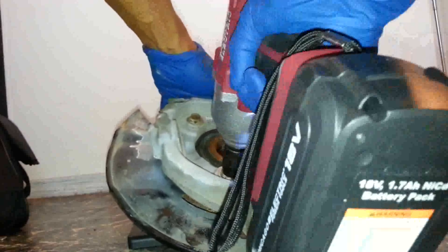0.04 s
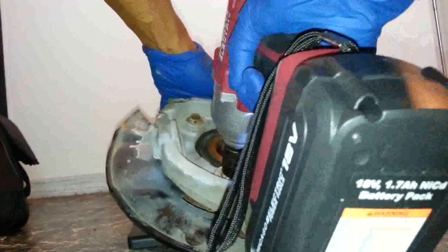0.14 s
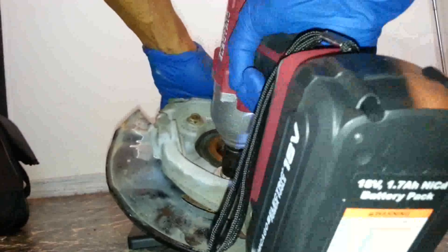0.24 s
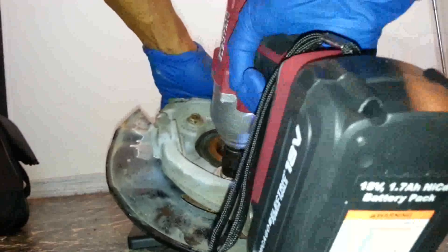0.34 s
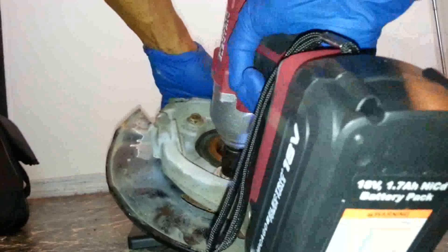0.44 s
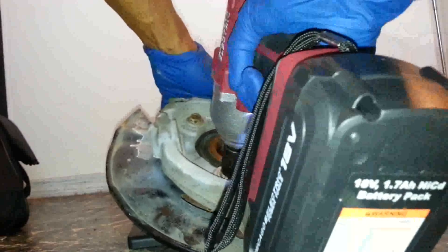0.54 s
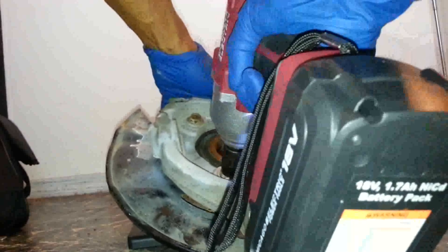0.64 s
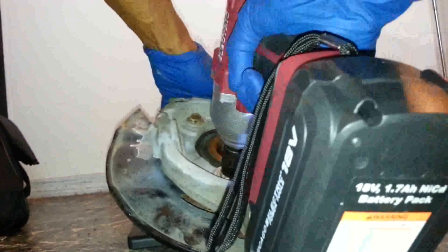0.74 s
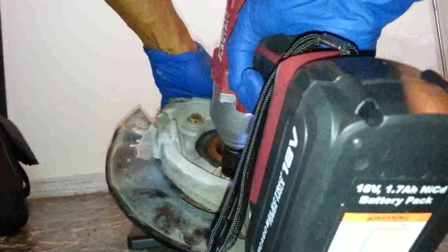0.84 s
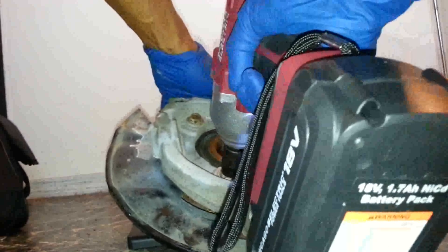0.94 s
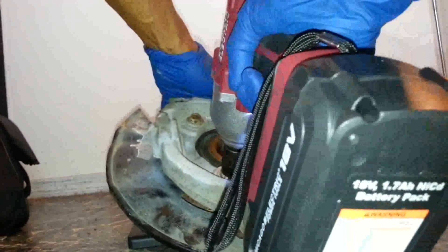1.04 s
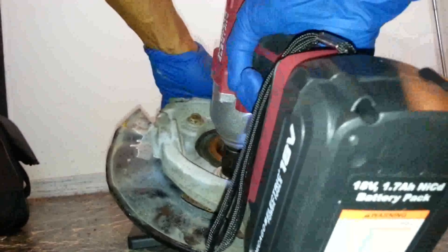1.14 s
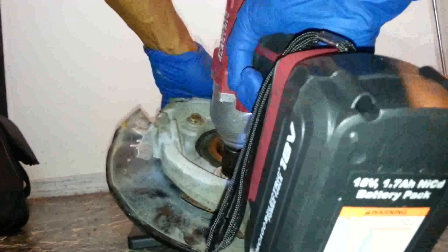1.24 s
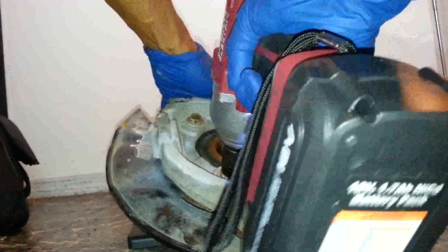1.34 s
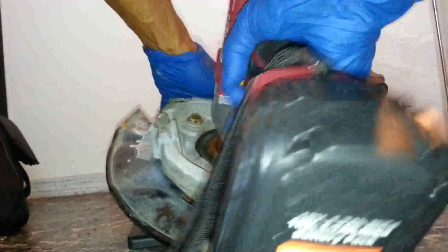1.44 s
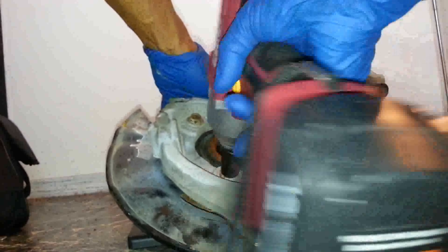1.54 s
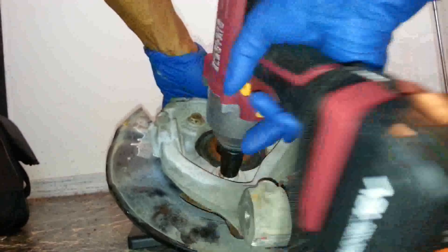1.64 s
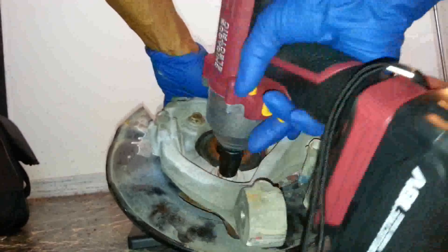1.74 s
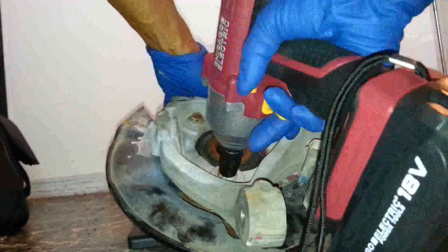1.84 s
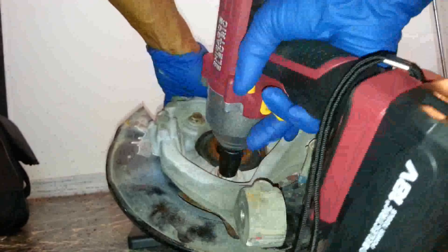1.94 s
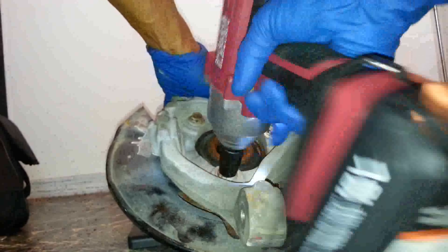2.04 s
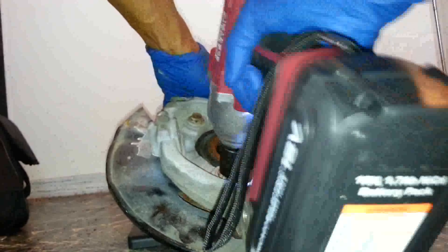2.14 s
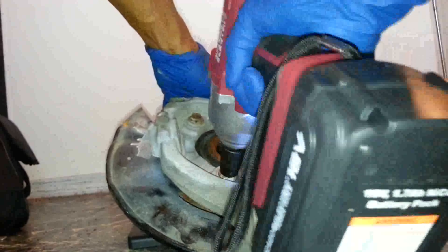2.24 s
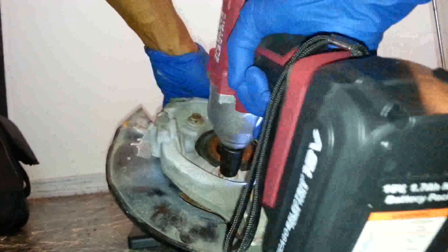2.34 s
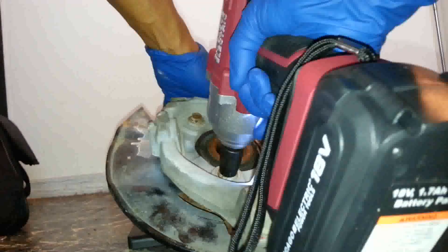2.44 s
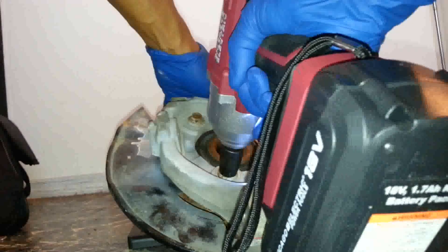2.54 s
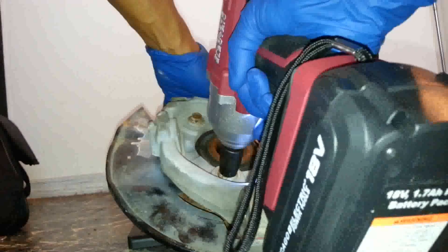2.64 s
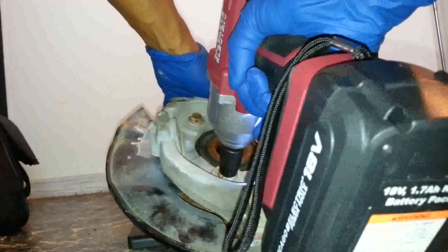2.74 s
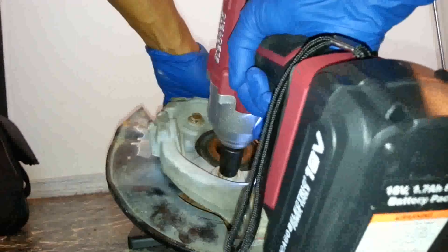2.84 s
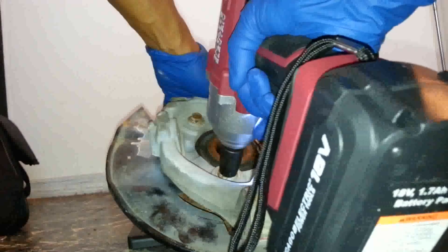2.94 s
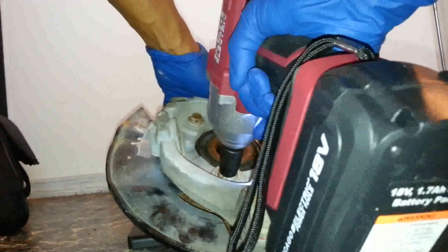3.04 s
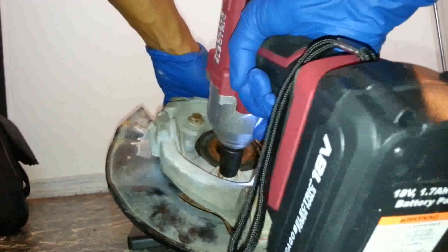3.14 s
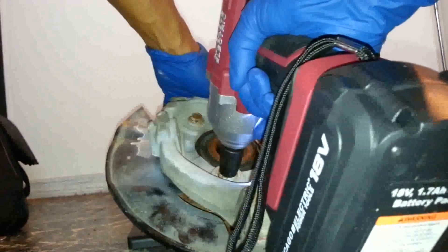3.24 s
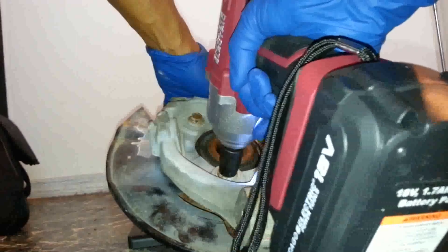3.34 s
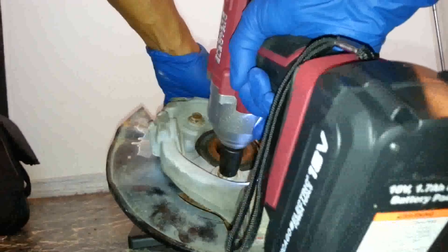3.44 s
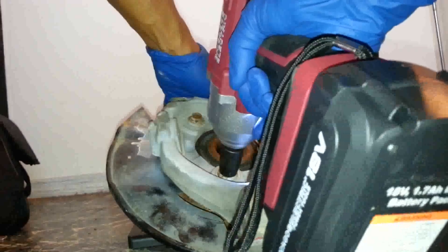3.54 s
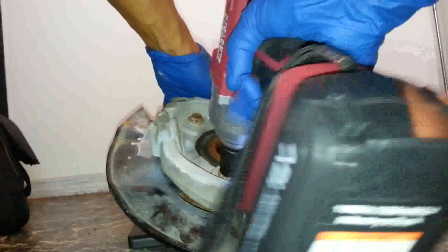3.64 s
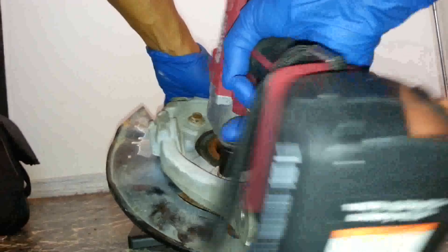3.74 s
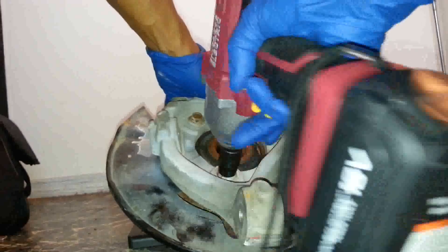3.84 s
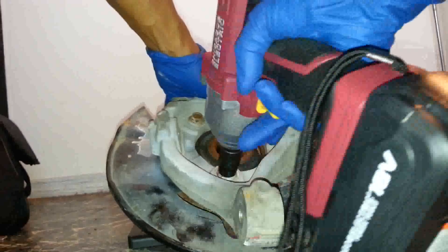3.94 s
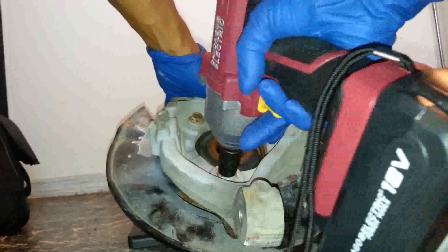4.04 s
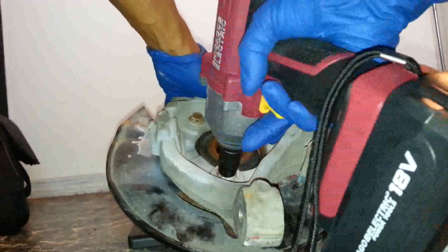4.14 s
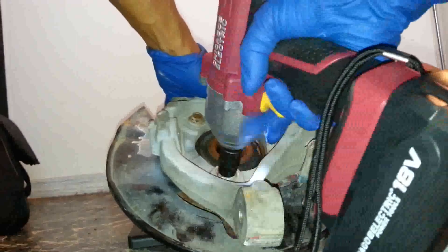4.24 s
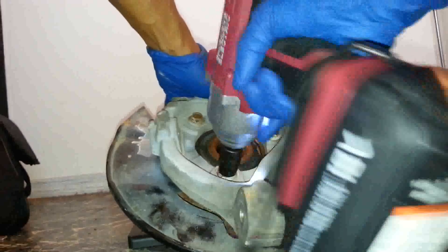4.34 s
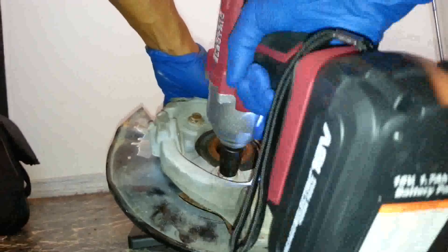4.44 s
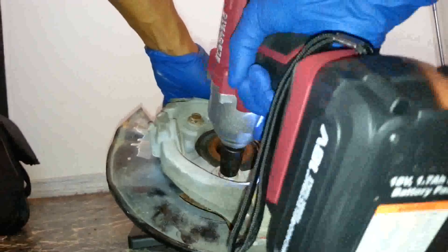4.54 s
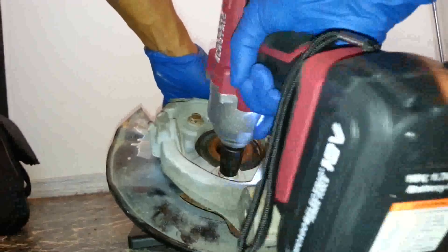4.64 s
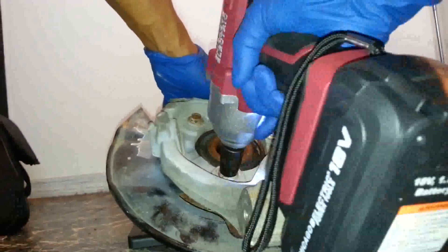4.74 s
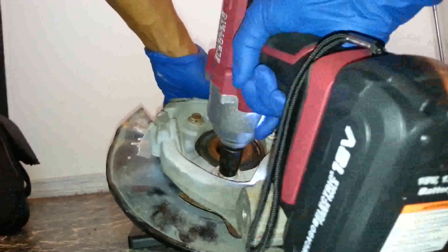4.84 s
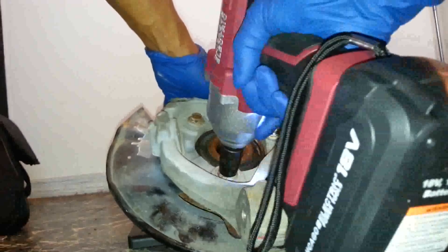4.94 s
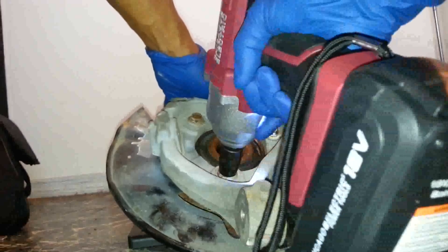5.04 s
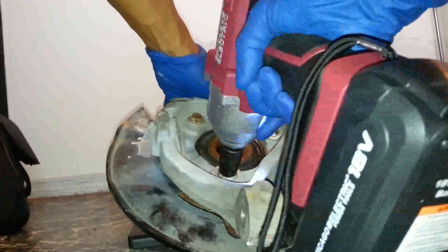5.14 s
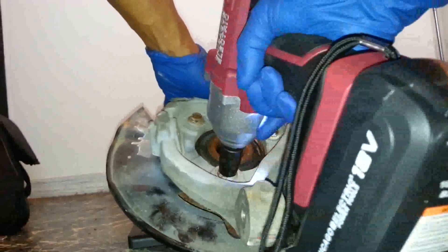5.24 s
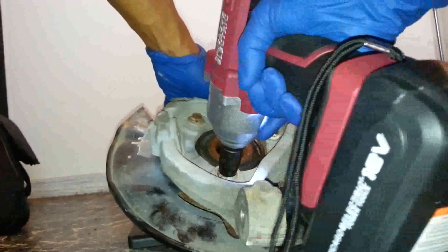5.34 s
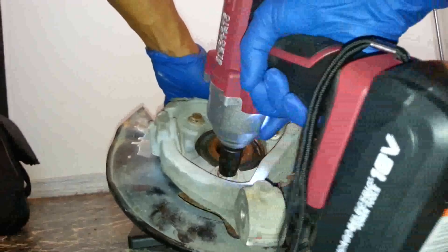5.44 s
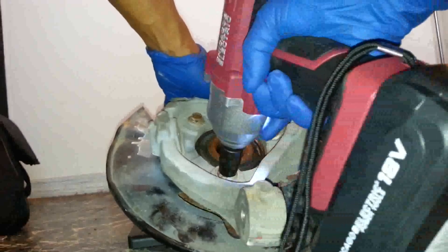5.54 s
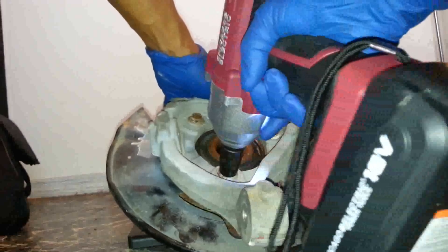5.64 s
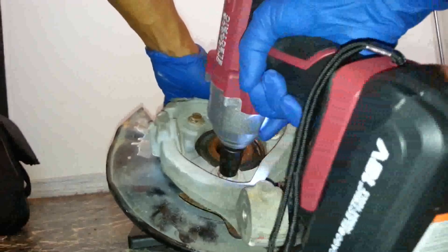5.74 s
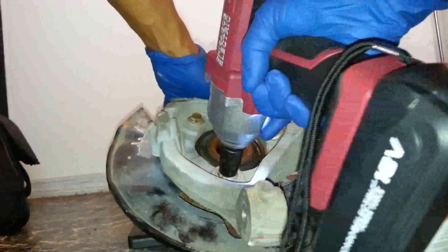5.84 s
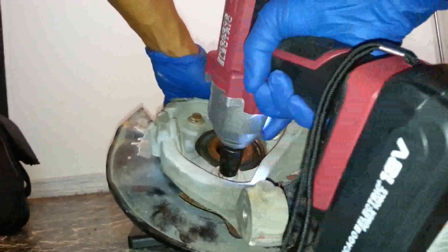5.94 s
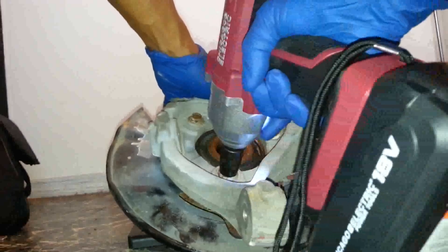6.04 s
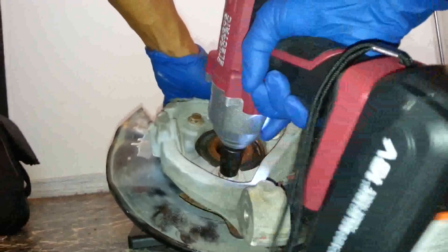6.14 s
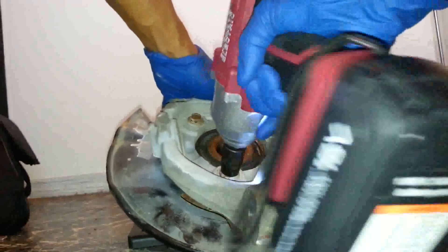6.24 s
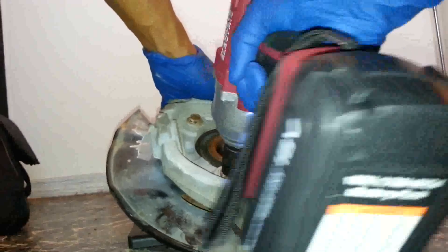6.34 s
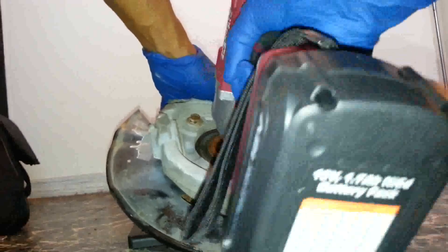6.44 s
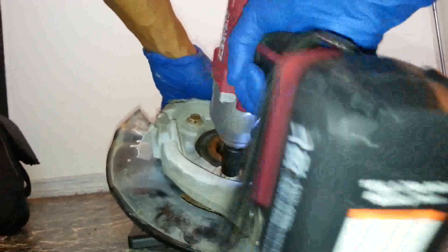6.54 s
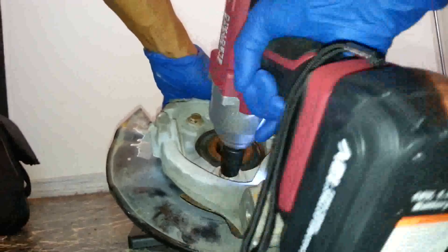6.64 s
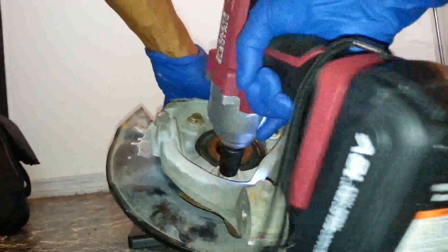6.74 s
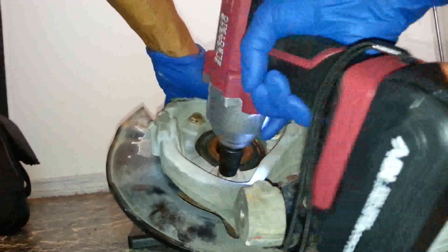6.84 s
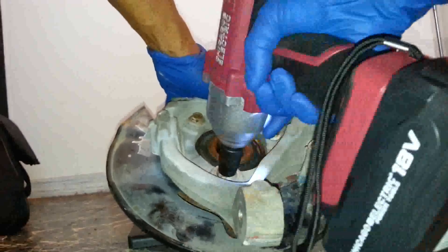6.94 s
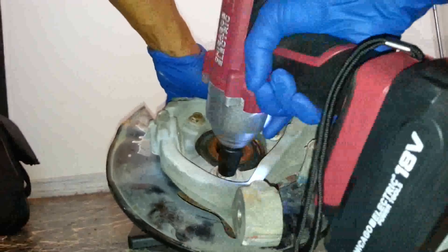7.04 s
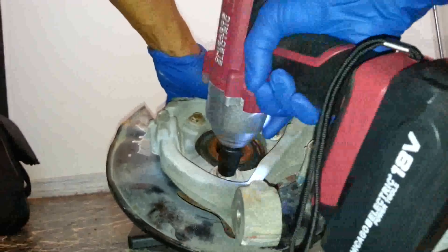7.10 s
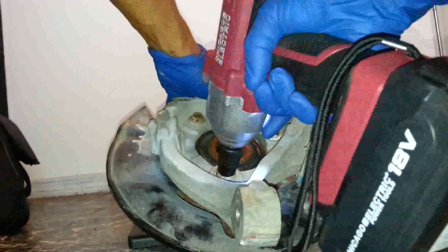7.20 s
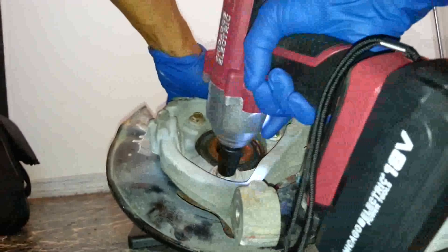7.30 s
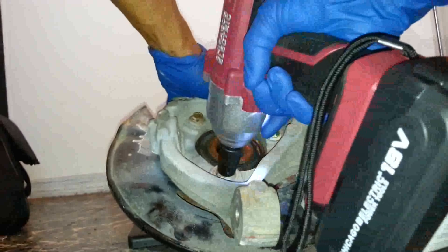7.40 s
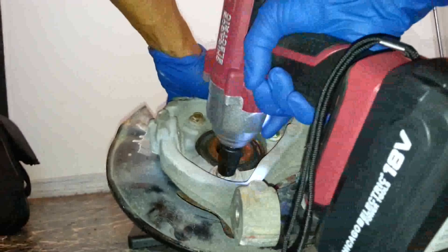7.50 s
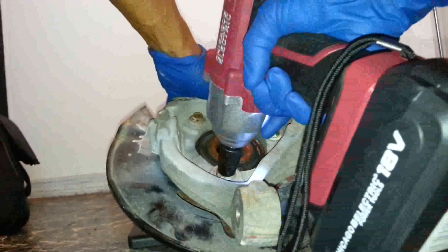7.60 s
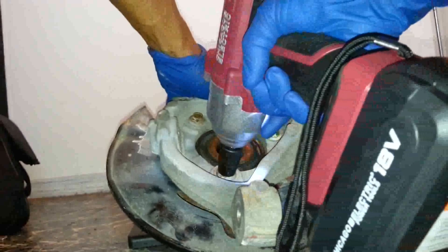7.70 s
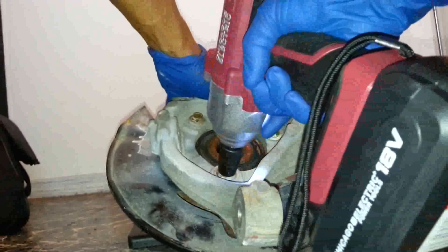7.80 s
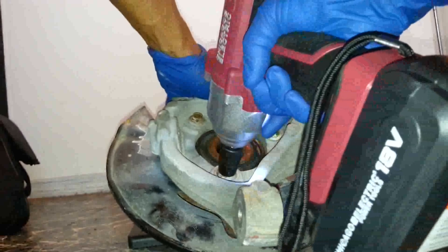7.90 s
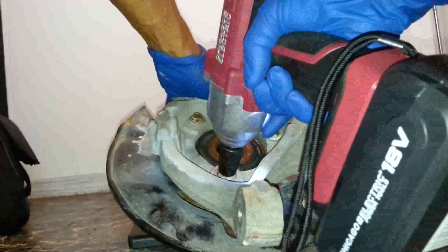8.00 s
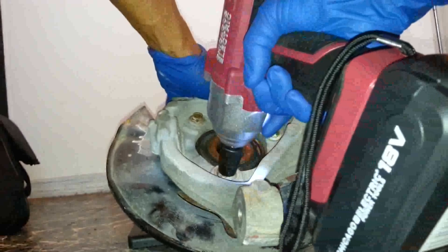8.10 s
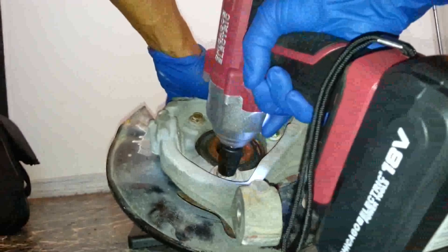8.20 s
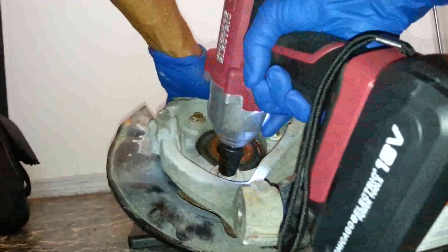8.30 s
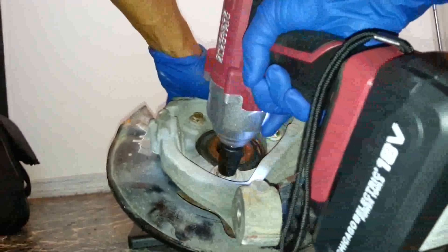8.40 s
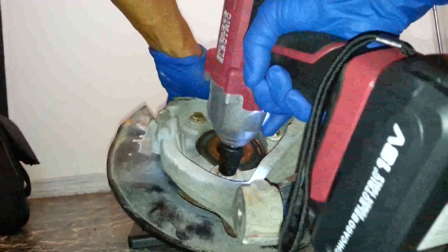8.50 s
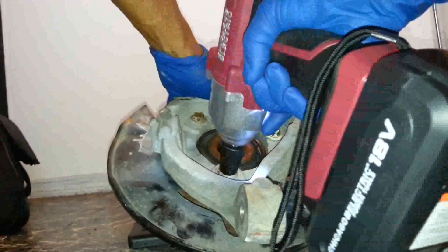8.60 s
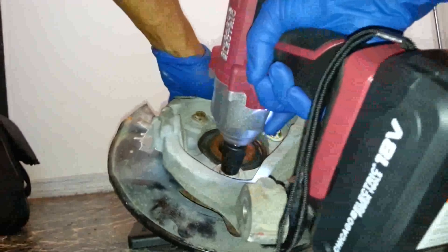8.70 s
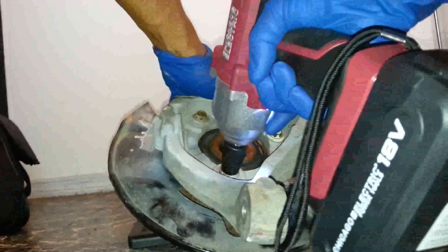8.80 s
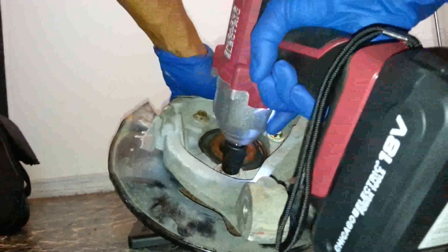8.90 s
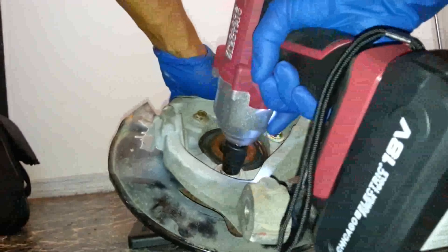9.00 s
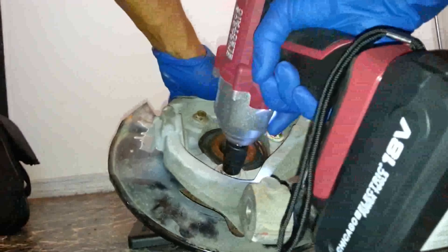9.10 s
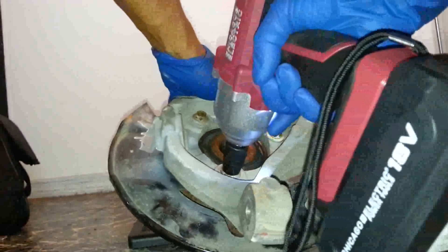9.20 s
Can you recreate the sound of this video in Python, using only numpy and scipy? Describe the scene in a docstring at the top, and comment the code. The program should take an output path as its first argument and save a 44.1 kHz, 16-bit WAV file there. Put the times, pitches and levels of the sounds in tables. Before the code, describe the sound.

The sound begins mid-burst: a cordless impact wrench, very close in a small reverberant workshop, hammers a seized bolt at about forty blows a second, a harsh, bright steel clatter with a dull body buzz below. At about 1.5 seconds it stops; the braking motor gives a thud and low ring, and echoes decay into faint background. Around 2.0 the gears rasp quickly upward, steel clacks, and a second burst runs from 2.1 to 3.7. Another jolt and echoing pause follow. At 4.25 the motor runs up again, a hard clack lands at 4.35, and the longest burst continues to the end. Its ringing changes colour as the tool shifts; from about 6.7 a loose socket rattles more strongly, sliding slightly lower after 8.2. The overloaded microphone flattens everything, with brief jumps in level.

```python
"""In a small workshop, close by, a cordless impact wrench hammers on a seized bolt in a steel housing, in three bursts.
Some forty blows a second, noise shaped by resonances, ring socket, anvil and housing; the first burst is under way.
The gears rasp as the motor runs up for the next two, and braking after the first two jolts the tool into a low ring.
Echoes made of fading noise fill the gaps over a faint background. The din overloads the microphones,
gain control presses it flat, and now and then the level jumps briefly."""
import sys
import numpy as np
from scipy import signal
from scipy.fft import rfft, irfft, next_fast_len
from scipy.io import wavfile
from scipy.ndimage import uniform_filter1d

SR = 44100
rng = np.random.default_rng(int(sys.argv[2]) if len(sys.argv) > 2 else 0)


def dump(signal):
    """Clip the signal to [-1, 1] and save it as 16-bit WAV at the path in sys.argv[1]."""
    limited = np.clip(np.atleast_2d(signal).T, -1, 1)
    pcm = np.round(limited * 32767).astype(np.int16)
    wavfile.write(sys.argv[1], SR, pcm)


N = 408366


def amp(db):
    """Decibels to gain."""
    return 10 ** (np.asarray(db) / 20)


def unit(x):
    """Scale to rms 1."""
    return x / np.sqrt(np.mean(x ** 2) + 1e-20)


def along(points, hz):
    """(Hz, value) points read on a log frequency axis."""
    f, v = np.transpose(points)
    return np.interp(np.log(hz + 1), np.log(f + 1), v)


def clock():
    """Sample times in seconds, from half a second early so that steel and room already ring."""
    return np.arange(-(SR // 2), N) / SR


def curve(rows):
    """(seconds, value) rows drawn out to one value per sample."""
    s, value = np.transpose(rows)
    return np.interp(clock(), s, value)


def noise():
    """Two unrelated channels of white noise."""
    return rng.standard_normal((2, len(clock())))


def filtered(x, gain):
    """x times a gain that depends on frequency."""
    size = next_fast_len(x.shape[-1] + SR // 4)
    spectrum = rfft(x, size) * gain(np.fft.rfftfreq(size, 1 / SR))
    return irfft(spectrum, size)[..., :x.shape[-1]]


def resonances(modes, hz):
    """Summed power response of (Hz, width Hz, dB) modes: each peaks at its centre and halves half a width away."""
    return sum(amp(db) ** 2 / (1 + (2 * (hz - centre) / width) ** 2) for centre, width, db in modes)


def ring(x, power, size=16384):
    """x through the causal, minimum-phase filter of energy 1 that has the shape of this power response."""
    cepstrum = irfft(np.log(power(np.fft.rfftfreq(size, 1 / SR)) + 1e-12) / 2)
    # folding the cepstrum forward in time makes the ring start at once and then die away
    response = irfft(np.exp(rfft(2 * cepstrum[:size // 2], size)))[:size // 2]
    response = response / np.linalg.norm(response)
    return signal.fftconvolve(x, response[None], axes=1)[:, :x.shape[1]]


# Colour of the faint background. Each row: frequency in Hz, relative level in dB.
BACKGROUND_COLOUR = [(24, -26.5), (40, 11), (476, 19), (899, -36), (2460, -35), (2920, -27.5), (7400, -32),
                     (14000, -51)]


def background():
    """A faint, steady bed of coloured noise."""
    return amp(-66) * unit(filtered(noise(), lambda hz: amp(along(BACKGROUND_COLOUR, hz))))


# How long the room rings. Each row: frequency in Hz, time to fall by 60 dB in seconds.
ROOM_DECAY = [(100, 0.91), (400, 0.33), (1100, 0.33), (2500, 0.48), (5000, 0.47), (9000, 0.49),
              (13000, 0.36)]
# What the walls send back. Each row: frequency in Hz, level in dB.
WALL_COLOUR = [(100, -3), (7500, 0), (10000, -0.5), (14000, 1)]


def workshop(source, count=40):
    """The walls' answer: each frequency dies at its own speed, and the echo paths change as tool and arms move."""
    x = filtered(source, lambda hz: amp(along(WALL_COLOUR, hz)))
    n, tail_size = x.shape[1], SR * 2 // 3
    hop = n // count + 1
    out = np.zeros((2, n + 2 * tail_size))
    for start in range(-hop, n, hop):
        # a fresh tail of fading noise for each overlapping piece of the sound
        hz, t, cells = signal.stft(rng.standard_normal((2, tail_size)), SR, nperseg=256)
        fade = amp(-60 * t / along(ROOM_DECAY, hz)[:, None])
        tail = signal.istft(cells * fade, SR, nperseg=256)[1]
        i = np.arange(max(start, 0), min(start + 2 * hop, n))
        piece = x[:, i] * np.sin(np.pi * (i - start) / (2 * hop))
        echo = signal.fftconvolve(piece, tail / np.linalg.norm(tail[0]), axes=1)
        # the first echo comes 4 ms late
        out[:, i[0] + SR // 250:][:, :echo.shape[1]] += echo
    return out[:, :n]


# Low modes of the tool's body. Each row: frequency in Hz, relative level in dB, time to fall by 60 dB in seconds.
BODY_MODES = [(127.5, -2.5, 0.55), (176, -9.5, 0.81), (197, 13.5, 0.15), (238, 1, 0.15), (336, 4.5, 0.15),
              (374, -18, 0.81), (530, -14, 0.41), (886, -15, .4)]
# Jolts as the motor brakes; the gears coast from them too. Each row: start in seconds, level in dB.
BRAKE_JOLTS = [(1.527, -12.5), (3.772, -15)]


def brake(attack_s):
    """Letting go of the trigger jolts the tool, whose body rings low as a sum of fading sines."""
    out = np.zeros((2, len(clock())))
    t = np.arange(SR) / SR
    for s, jolt_db in BRAKE_JOLTS:
        hum = np.zeros((2, SR))
        for hz, mode_db, t60 in BODY_MODES:
            phase = rng.uniform(0, 2 * np.pi, (2, 1))
            hum += amp(mode_db - 60 * t / t60) * np.sin(2 * np.pi * hz * t + phase)
        out[:, np.searchsorted(clock(), s):][:, :SR] += amp(jolt_db) * hum * (1 - np.exp(-t / attack_s))
    return out


# The motor runs up freely. Each row: trigger in seconds, run-up time in seconds, relative level at full speed in dB.
MOTOR_RUN_UPS = [(1.998, .08, 0), (4.257, 0.057, -7.5)]
# gear level grows as speed to this power, holds at full speed, then fades as the hammer takes the load
SPEED_POWER, FREE_RUN_S, LOAD_DB_PER_S = 3.2, .015, 481
# the coasting gears fade in just before each brake jolt, then die away
COAST_DB, COAST_RISE_S, COAST_DB_PER_S = -14, 0.022, 115.5
# a faint floor for their last slow turns, and how long after the jolt they begin to fall silent
CREEP_DB, STANDSTILL_S = -56, 0.35


def gear_level():
    """Loudness of the gears: it grows with speed in each run-up and dies away after each brake jolt."""
    t = clock()
    level = np.zeros(len(t))
    for s, run_up_s, db in MOTOR_RUN_UPS:
        speed = np.clip((t - s) / run_up_s, 0, 1)
        loaded_s = np.maximum(t - s - run_up_s - FREE_RUN_S, 0)
        level += speed ** SPEED_POWER * amp(db - LOAD_DB_PER_S * loaded_s)
    for s, _ in BRAKE_JOLTS:
        corners = [-COAST_RISE_S, 0, STANDSTILL_S, STANDSTILL_S + COAST_RISE_S]
        turning = np.interp(t - s, corners, [0, 1, 1, 0])
        coast = amp(COAST_DB - COAST_DB_PER_S * np.maximum(t - s, 0))
        level += turning * (coast + amp(CREEP_DB))
    return level


# Colour of the gears' rasp. Each row: frequency in Hz, relative level in dB.
GEAR_COLOUR = [(24, -41.5), (40, -9), (118, -8), (239, -16), (525, -5.5), (1580, -6), (2640, -7),
               (5000, -7.5), (6710, -5), (9230, -19), (14000, -33)]
# Modes of the gear case, rung by the turning gears. Each row: frequency in Hz, width in Hz, relative level in dB.
GEAR_CASE_MODES = [(2450, 200, -1.5), (5630, 60, 6), (7000, 400, -3), (8100, 150, -5)]


def motor(tooth_hz, rough):
    """The gears rasp: noise rung by their case and pulsed by the teeth, whose pace follows the gear level."""
    level = gear_level()
    # tooth_hz is the pace at level 1, rough the depth of the pulsing
    mesh = 1 + rough * np.sin(2 * np.pi * np.cumsum(tooth_hz * level ** .2) / SR)
    power = lambda hz: amp(along(GEAR_COLOUR, hz)) ** 2 + resonances(GEAR_CASE_MODES, hz)
    return level * mesh * unit(ring(noise(), power))


# Knocks as the drive takes up its play or stops. Each row: start in seconds, clack level in dB, thud level in dB.
DRIVE_KNOCKS = [(1.526, -21, -15), (2.023, -22, -43), (2.033, -18, -42), (2.042, -10, -33), (2.073, -4, -2),
                (3.773, -26, -15), (4.286, -26, -40), (4.351, 9, 1)]
# The crack of steel, for clacks here and for blows between the modes. Each row: frequency in Hz, relative level in dB.
CRACK_COLOUR = [(25, -33), (60, -14.5), (130, -6), (400, -5.5), (1000, -6), (2000, -6), (2600, -3),
                (4000, 1.5), (7000, 0.0), (8400, -1.05), (10000, -3), (14200, -6.5)]
# Colour of the thud. Each row: frequency in Hz, relative level in dB.
THUD_COLOUR = [(25, -12), (80, 4.5), (200, -4.5), (400, -12), (1500, -24), (6000, -75)]


def knocks(clack_s, thud_s):
    """A bright clack of steel and a slower thud of the tool's body, both fading bursts of coloured noise."""
    t = clock()
    fade = lambda s, life: (t >= s) * np.exp(-np.abs(t - s) / life)
    clacks = sum(amp(db) * fade(s, clack_s) for s, db, _ in DRIVE_KNOCKS)
    thuds = sum(amp(db) * fade(s, thud_s) for s, _, db in DRIVE_KNOCKS)
    coloured = lambda colour: unit(filtered(noise(), lambda hz: amp(along(colour, hz))))
    return clacks * coloured(CRACK_COLOUR) + thuds * coloured(THUD_COLOUR)


# Bursts of hammering. Each row: first blow in seconds, last blow in seconds.
BURSTS = [(-.4, 1.49), (2.07, 3.723), (4.348, 9.4)]


def blows(rate, contact_s, chatter, scatter_db, jitter_s):
    """Force on the anvil: a sharp hit as each lug lands, over a steady chatter that fills the hammer's wind-up."""
    t = clock()
    times = t[1:][np.diff(np.floor(np.cumsum(rate) / SR)) > 0]
    chance = rng.standard_normal((len(times), 2))
    times = np.sort(times + jitter_s * chance[:, 0])
    last = np.maximum(np.searchsorted(times, t) - 1, 0)
    hit = amp(scatter_db * chance[last, 1]) * np.exp(-np.abs(t - times[last]) / contact_s)
    hammering = sum((t > first) & (t < final) for first, final in BURSTS)
    return unit((hit + chatter) * hammering)


# Modes of socket, anvil and housing. Each row: frequency in Hz, width in Hz, relative level in dB with the
# handle straight, relative level in dB with it swung aside.
STEEL_MODES = [(239.7, 32, 0.5, -1), (872, 20, -4.5, 0), (1208, 91, -2, -0.5), (1524, 9.7, 3.5, -5),
               (1675, 12, 5.5, -9.5), (1754, 60, 1.5, 4.5), (2355, 27, 6, 7), (2535, 36, 5, 7.5),
               (2663, 39, 5.5, 3), (2890, 160, -1, 3.5), (3020, 41, 6, -2.5), (3125, 17.4, 10.5, 6.5),
               (3446, 124, -0.5, 5), (3650, 250, -2, -5), (4295, 12.5, 11, 0), (4400, 30, 10, -10),
               (4320, 18, -1, 6), (4560, 21, 1, 5), (4838, 137, 3.5, 9.5), (4904, 59, 10, 4),
               (5120, 5.7, 9.5, 13), (5400, 54, 4, 3), (5606, 90, 9, 9), (6350, 25, 14.5, 8),
               (6620, 18, 8, -2), (6725, 64, 8, 8.5), (7257, 107, 7, 7.5), (7540, 107, -1, 0),
               (8070, 71, 7, 1), (8940, 150, -17, 4.5)]
# How far the handle is swung aside. Each row: time in seconds, swing from 0 to 1.
HANDLE_SWING = [(0, .05), (1.5, 0.02), (2.1, .34), (3.7, 0.04), (4.4, .6), (6.1, 1), (6.5, 0.54), (7.0, 1)]


def steel(force):
    """The blows ring the steel; the swing of the handle shifts the weight among its modes."""
    swing = np.clip(curve(HANDLE_SWING), 0, 1)
    contact, modes = force * noise(), np.array(STEEL_MODES)
    crack = lambda hz: amp(along(CRACK_COLOUR, hz)) ** 2
    straight = ring(contact, lambda hz: crack(hz) + resonances(modes[:, [0, 1, 2]], hz))
    swung = ring(contact, lambda hz: crack(hz) + resonances(modes[:, [0, 1, 3]], hz))
    return (1 - swing) * straight + swing * swung


# Modes of the socket sitting askew on the bolt. Each row: frequency in Hz, width in Hz, relative level in dB.
SOCKET_MODES = [(4600, 120, -4), (4820, 61, -1.5), (4924, 120, 4.5)]
# it rattles faintly while it sits square, and louder once it has tipped askew
SQUARE_DB, ASKEW_DB, TIP_AT_S, TIP_TAKES_S = -27, -9, 6.66, 0.37
# near the end it slips further and rings lower: when, over how long, pitch against before
SLIP_AT_S, SLIP_TAKES_S, SLIP_PITCH = 8.2, 0.78, .95


def socket(force):
    """The loose socket rattles in its own modes, crossfading to a lower pitch as it slips."""
    level_db = np.interp(clock() - TIP_AT_S, [0, TIP_TAKES_S], [SQUARE_DB, ASKEW_DB])
    rattle = force * noise() * amp(level_db)
    slip = np.clip((clock() - SLIP_AT_S) / SLIP_TAKES_S, 0, 1)
    before = ring(rattle * np.sqrt(1 - slip), lambda hz: resonances(SOCKET_MODES, hz))
    after = ring(rattle * np.sqrt(slip), lambda hz: resonances(SOCKET_MODES, hz / SLIP_PITCH))
    return before + after


# Modes of the thin backing plate. Each row: frequency in Hz, width in Hz, relative level in dB.
PLATE_MODES = [(1670, 30, -8), (1767, 107, 3)]
# How strongly the plate is shaken. Each row: time in seconds, relative level in dB.
PLATE_SHAKE = [(0, -47), (1.5, -18.5), (4.4, -30), (4.85, -15), (5.5, -15.5), (6.0, -22), (6.5, -16),
               (7.0, -27), (9.25, -28)]


def plate(force):
    """The blows shake the thin backing plate, which rings by a changing amount."""
    return ring(force * noise() * amp(curve(PLATE_SHAKE)), lambda hz: resonances(PLATE_MODES, hz))


# The body's answer to each blow. Each row: frequency in Hz, relative level in dB.
KICK_COLOUR = [(25, -15), (70, -8.5), (120, -2.5), (165, -7), (240, 1), (320, -2), (600, -11.5),
               (1200, -8.5), (4000, -39)]


def kick(force):
    """The front of each blow kicks the tool's body, a dull buzz under the ringing."""
    fronts = np.maximum(np.diff(force, prepend=0), 0)
    buzz = unit(ring(fronts[None], lambda hz: amp(along(KICK_COLOUR, hz)) ** 2))
    return amp(-26) * buzz * np.array([[1.2], [.5]])


# the hammer's pace in blows a second at time zero, and what it loses each second as the battery sags
PACE_HZ, SAG_HZ_PER_S = 40.7, .16


def hammer():
    """One train of blows drives steel, socket, plate and tool body together."""
    pace = PACE_HZ - SAG_HZ_PER_S * clock()
    force = blows(pace, contact_s=.0055, chatter=.15, scatter_db=2.2, jitter_s=.0005)
    return amp(6) * (steel(force) + socket(force) + plate(force) + kick(force))


# Balance of the two ports. Each row: frequency in Hz, left minus right level in dB.
PORT_BALANCE = [(60, -8.5), (250, -2.5), (800, -3.5), (1200, 4), (1500, -0.5), (2500, 5.5), (3200, 3),
                (4900, 6), (5600, 3), (6100, -5), (7100, -9), (8200, -7), (9200, -2.5), (13000, -2)]
# Likeness of the two ports. Each row: frequency in Hz, left-right correlation for equally strong inputs.
PORT_LIKENESS = [(60, 0.2), (280, 0.33), (1350, 0.24), (3500, 0.17), (6400, 0.065), (14000, .03)]


def microphones(x, lag_s=.0001):
    """Two ports: partly alike, each with its own colour, the right one reached a little sooner."""
    turn = lambda hz: np.arccos(np.clip(along(PORT_LIKENESS, hz), -1, 1)) / 2
    # the first channel becomes what the ports share, the second what sets them apart
    mid, side = filtered(x, lambda hz: np.array([np.cos(turn(hz)), np.sin(turn(hz))]))
    half = np.array([[.5], [-.5]])
    ports = lambda hz: amp(half * along(PORT_BALANCE, hz)) * np.exp(-2j * np.pi * hz * half * lag_s)
    return filtered(np.array([mid + side, mid - side]), ports)


def scene():
    """Background, room, brake jolts and the wrench itself, heard at the two ports."""
    wrench = motor(tooth_hz=330, rough=0.25) + knocks(clack_s=0.0047, thud_s=0.011) + hammer()
    room = workshop(wrench)
    mix = background() + amp(-2.5) * room + brake(attack_s=0.009) + amp(-0.5) * wrench
    return microphones(mix)[:, -N:]


def overload(x, top, order=6):
    """Peaks flatten as they reach the top; a higher order makes a harder corner."""
    return x / (1 + np.abs(x / top) ** order) ** (1 / order)


def gain_control(x, target_db, window_s, knee):
    """Turns the gain down as the level, averaged over a window around each moment, nears the target."""
    power = np.abs(uniform_filter1d(np.mean(x ** 2, axis=0), max(int(window_s * SR), 1)))
    return x / (1 + (power / amp(target_db) ** 2) ** knee) ** (.5 / knee)


# every jump rises, holds, falls back and dips a little before the level settles
JUMP_DB, JUMP_ATTACK_S, JUMP_HOLD_S, DIP_DB, DIP_S = 6, 0.0019, .018, -1.4, 0.013


def jump(t, release_s):
    """One jump of the gain in dB, t seconds after its start: attack, hold, release, a slight dip."""
    corners = np.cumsum([0, JUMP_ATTACK_S, JUMP_HOLD_S, release_s, DIP_S, DIP_S])
    return np.interp(t, corners, [0, JUMP_DB, JUMP_DB, 0, DIP_DB, 0])


def flutter(t, spread_db=.45, steps_per_s=47):
    """The level flutters slightly: random steps in dB, their edges smoothed over 2 ms."""
    steps = np.arange(0, t[-1] + 1, 1 / steps_per_s)
    stepped_db = spread_db * rng.standard_normal(len(steps))[np.searchsorted(steps, t)]
    return uniform_filter1d(stepped_db, SR // 500)


# Brief jumps of the level. Each row: start in seconds, release in seconds.
LEVEL_JUMPS = [(.11, 0.022), (.388, 0.022), (.536, 0.026), (.794, .025), (.879, 0.026), (.964, 0.02),
               (1.156, 0.027), (1.455, .03), (2.073, 0.028), (2.138, 0.024), (3.331, 0.028), (4.676, 0.031),
               (4.995, .03), (5.144, .02), (5.466, 0.12), (5.977, 0.023), (6.511, 0.028), (6.616, 0.021),
               (6.809, 0.029), (6.98, .07), (8.025, 0.022), (8.153, 0.033), (8.323, 0.028), (8.494, .02),
               (9.092, .03), (9.177, .03)]
TOP_HZ = 14550  # middle of the treble cut-off


def record(dry):
    """The din overloads the microphones; then gain control, brief jumps of the level, full scale and the band limit."""
    t = np.arange(N) / SR
    band = lambda hz: np.clip((TOP_HZ - hz) / 300 + .5, 0, 1)
    x = overload(dry, top=2.2)
    # the bass rolls off below 45 Hz
    x = filtered(x, lambda hz: band(hz) * hz / np.hypot(hz, 45))
    jump_db = sum(jump(t - s, release_s) for s, release_s in LEVEL_JUMPS)
    x = gain_control(x, target_db=-11.0, window_s=0.021, knee=0.87)
    x = x * amp(jump_db + flutter(t))
    x = overload(x, top=1.05, order=12)
    return filtered(x, band)


dry = scene()
out = record(dry)
dump(out)
```